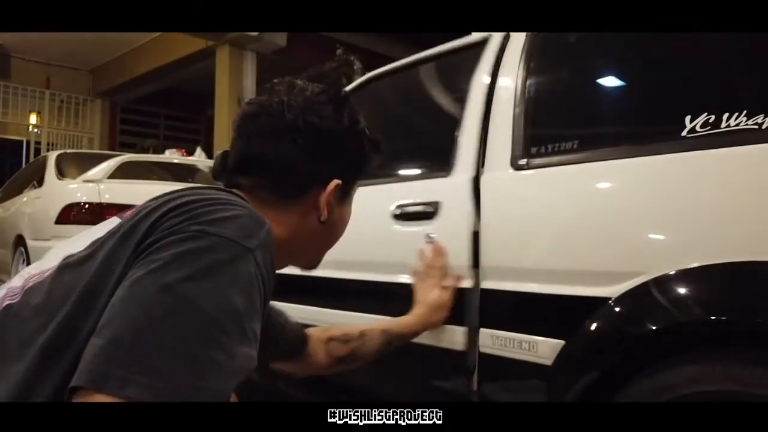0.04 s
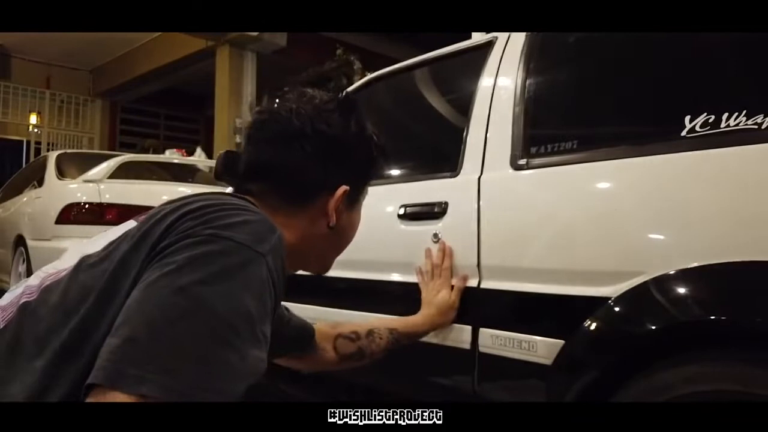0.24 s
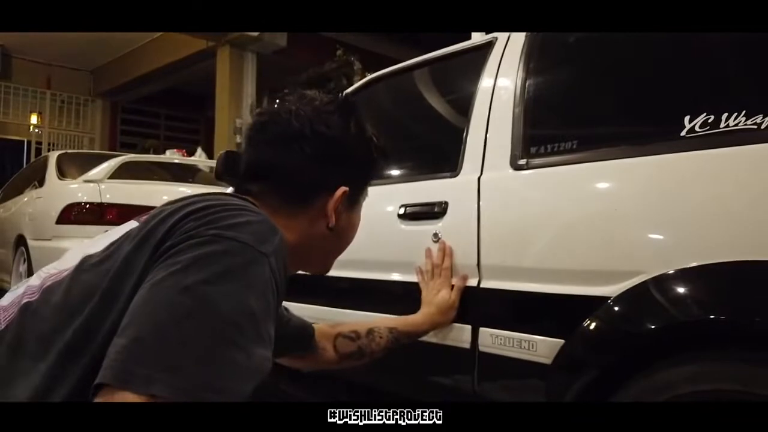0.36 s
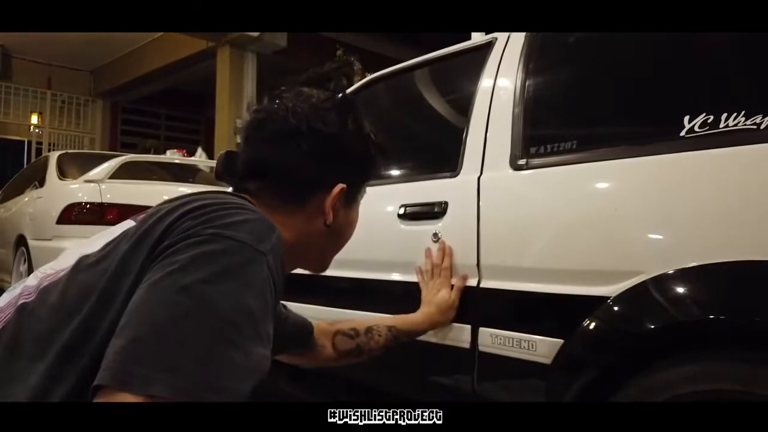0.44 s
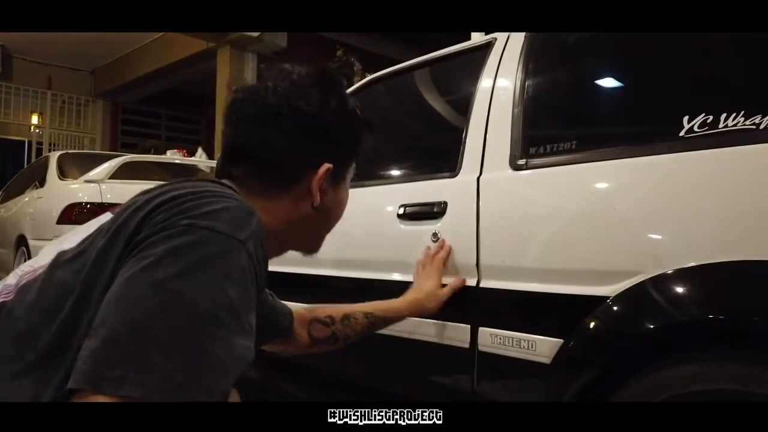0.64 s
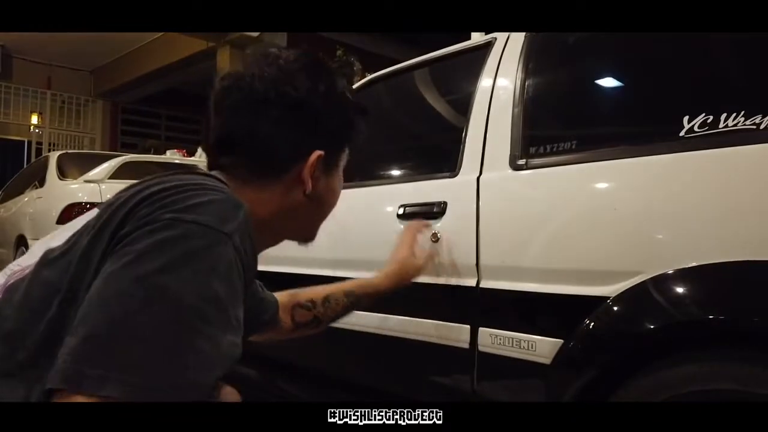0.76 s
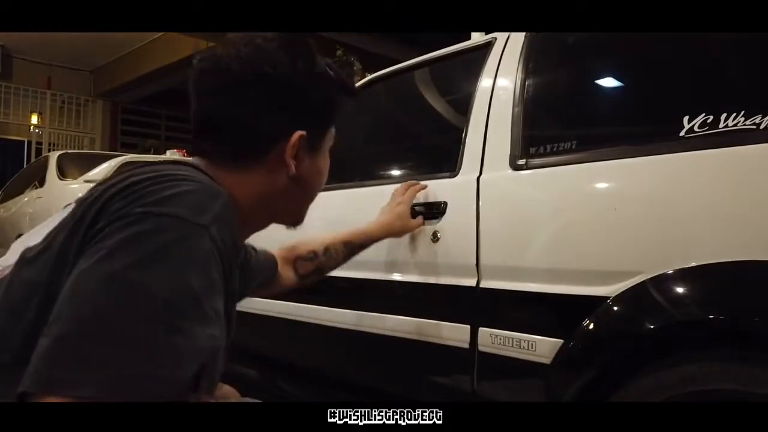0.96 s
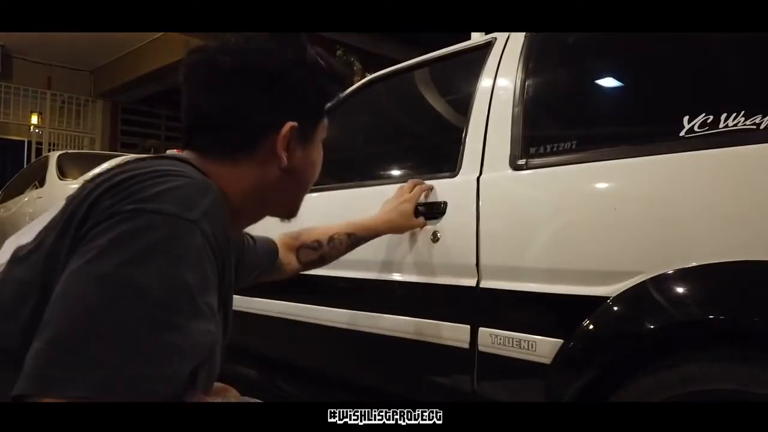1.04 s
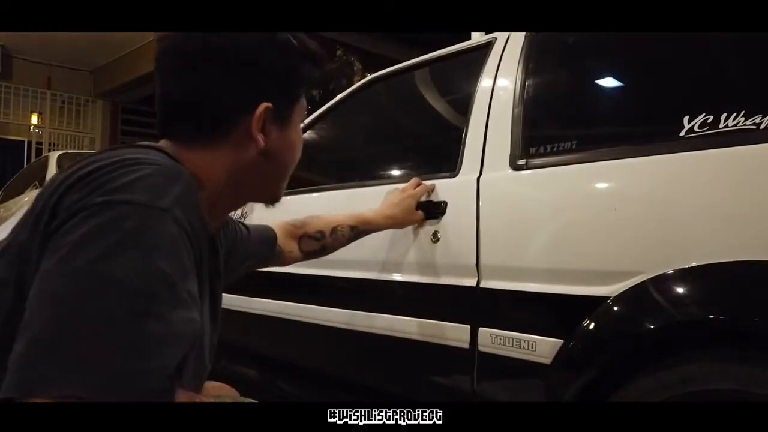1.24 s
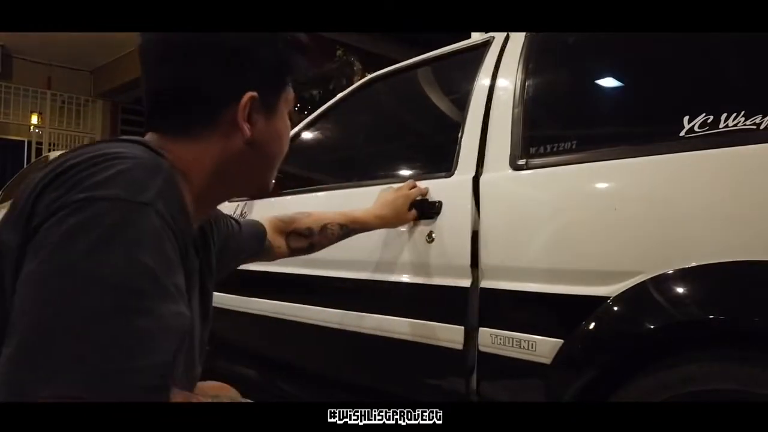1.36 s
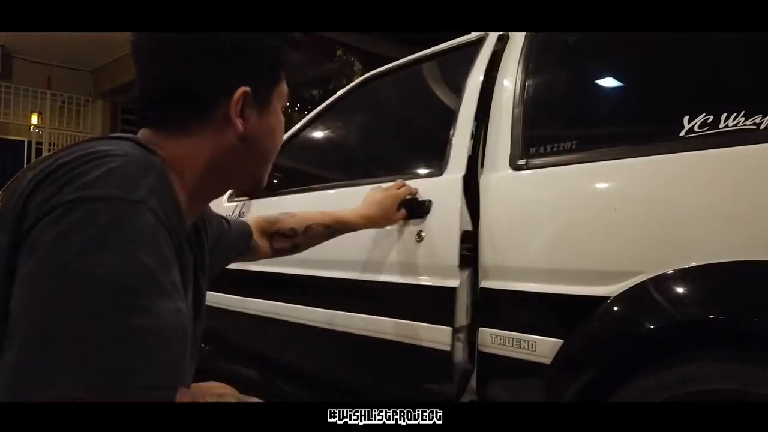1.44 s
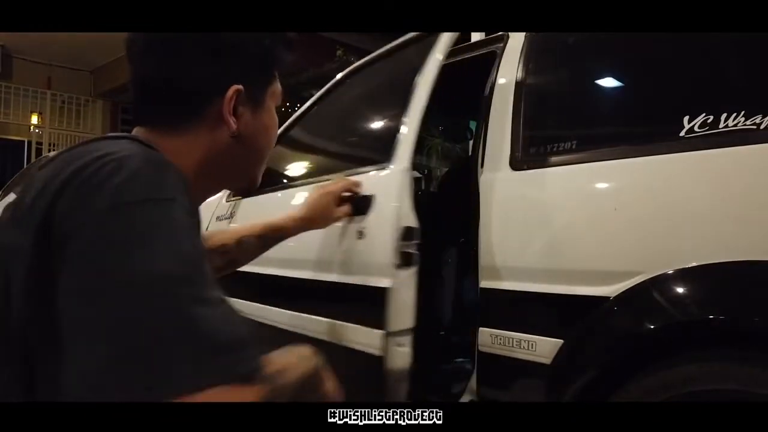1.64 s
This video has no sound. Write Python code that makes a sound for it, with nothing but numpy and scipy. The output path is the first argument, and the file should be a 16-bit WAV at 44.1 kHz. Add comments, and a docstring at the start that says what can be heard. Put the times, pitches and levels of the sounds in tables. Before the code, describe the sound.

Close to the microphone in a quiet carport at night, a car door slams with a latch crack and low boom. After soft taps on the panel, the handle is pulled and the door clicks open again.

```python
"""Car door at night, shut and reopened

A car door is pushed shut under a carport, a metre from a phone: the latch cracks, cabin air booms,
panels ring and trim rattles. After an airy scuff, fingers tap the door skin, the handle squeaks,
its linkage scrapes and the latch clicks free. Insects and town rumble lie underneath."""
import sys
import numpy as np
from scipy import signal
from scipy.fft import rfft, irfft
from scipy.io import wavfile
from scipy.ndimage import uniform_filter1d

SR = 44100
rng = np.random.default_rng(int(sys.argv[2]) if len(sys.argv) > 2 else 0)


def generate_wav(signal):
    """Clip the signal to [-1, 1] and save it as 16-bit WAV at the path in sys.argv[1]."""
    frames = np.transpose(np.atleast_2d(signal))
    scaled = np.clip(frames, -1, 1) * 32767
    pcm = np.round(scaled).astype(np.int16)
    wavfile.write(sys.argv[1], SR, pcm)


N = 74970


def undb(db):
    """Decibels to amplitude."""
    return 10 ** (np.asarray(db) / 20)


def unit(x):
    """Scale to an RMS of one."""
    return x / np.sqrt(np.mean(x ** 2))


def curve(table, col=1):
    """A column of a time table at every sample."""
    points = np.array(table)
    return np.interp(np.arange(N) / SR, points[:, 0], points[:, col])


def at_hz(table, hz):
    """Read a frequency table along a log axis."""
    points = np.array(table)
    return np.interp(np.log(hz), np.log(points[:, 0]), points[:, 1])


def noise(colour):
    """Unit-RMS stereo noise shaped by (frequency [Hz], level [dB]): centred bass, wide treble."""
    # stereo image (frequency [Hz], left-right correlation [0-1])
    likeness = [(60, 0.99), (200, 1), (500, 0.99), (1000, 0.93), (2000, 0.74), (4000, 0.36), (8000, 0.25),
                (16000, 0.4)]
    bins_hz = np.fft.rfftfreq(N, 1 / SR) + 1
    alike = at_hz(likeness, bins_hz)
    spectra = rfft(rng.standard_normal((2, N))) * undb(at_hz(colour, bins_hz))
    mid, side = spectra * np.sqrt([1 + alike, 1 - alike])
    return unit(irfft(np.array([mid + side, mid - side]), N))


def ring(x, hz, t60):
    """One decaying mode, driven by x."""
    pole = np.exp(2j * np.pi * hz / SR - np.log(1000) / (t60 * SR))
    return signal.lfilter([1], [1, -pole], x).imag


def band(x, hz, width_hz):
    """Band-pass around hz."""
    low_hz = max(hz - width_hz / 2, 20)
    return signal.sosfilt(signal.butter(2, [low_hz, low_hz + width_hz], "band", fs=SR, output="sos"), x)


def lowpass(x, hz, order):
    """Dull the treble above hz."""
    return signal.sosfilt(signal.butter(order, hz, fs=SR, output="sos"), x)


def waver(rate_hz):
    """Unit-RMS modulation that glides between random values."""
    step = int(SR / rate_hz)
    held = np.repeat(rng.standard_normal(N // step + 1), step)
    return unit(uniform_filter1d(held, step)[:N])


def arch(t, start, length):
    """A half-sine pulse."""
    return np.sin(np.pi * np.clip((t - start) / length, 0, 1))


def night():
    """The bed: town rumble and hiss with bands of throbbing insect song."""
    # town rumble and hiss (frequency [Hz], relative level [dB])
    town_colour = [(25, -1.5), (142, -12.5), (433, -24.5), (830, -29), (1360, -30), (2000, -30.5),
                   (2700, -33.5), (3700, -37.5), (5000, -34.5), (6100, -45), (8000, -41.5), (11500, -45),
                   (13000, -55), (16500, -80)]
    # insect song (pitch [Hz], width [Hz], level against the town [dB])
    songs = [(4400, 890, -13), (9150.9, 1514.5, -15), (3590, 25, -25), (4620, 23, -16), (4737.3, 50, -34)]
    # the bed sinks after the slam (time [s], level [dB])
    bed_level = [(0, -42), (.2, -41.5), (.3, -53.5), (.9, -53.5), (1.1, -53.5), (1.3, -52), (1.66, -51),
                 (1.7, -51)]
    throb_db, drift_db = 2, 1.0
    white = noise([(20, 0.02), (20000, 0.0061)])
    insects = 0
    for hz, width_hz, db in songs:
        song = unit(band(band(white, hz, width_hz), hz, width_hz))
        insects += undb(db + throb_db * waver(57)) * song
    town = noise(town_colour) * undb(drift_db * waver(6.35))
    return undb(curve(bed_level)) * (town + insects)


def carport_reverb(x, t):
    """The carport's short tail: octave bands of noise, each dying at its own rate."""
    # carport decay (frequency [Hz], t60 [s])
    decay = [(60, 0.26), (250, 0.44), (1000, 0.45), (3000, 0.54), (8000, 0.39), (16000, 0.2203)]
    wet_db = -12
    white = noise([(20, 0.0072), (20000, 0)])
    tail = 0
    for low_hz in 62.5 * 2. ** np.arange(8):
        t60 = at_hz(decay, low_hz * 1.4)
        tail += band(white, low_hz * 1.5, width_hz=low_hz) * undb(-60 * t / t60)
    tail = undb(wet_db) * tail / np.sqrt(np.sum(tail ** 2) / 2)
    return signal.fftconvolve(x.mean(0, keepdims=True), tail, axes=1)[:, :N]


def car_sway():
    """Low rumble of the moving door and rocking car."""
    # rumble envelopes (time [s], sub level [dB], bass level [dB])
    levels = [(0, -50, -60), (.1, -43, -49.5), (.2, -49, -50), (.33, -30.5, -29.5), (.55, -34.5, -49),
              (.7, -38, -56), (.92, -41, -80.5), (1.05, -47, -57), (1.28, -55.5, -63), (1.36, -66, -46.5),
              (1.44, -40, -48), (1.6, -62, -69), (1.7, -51, -52)]
    white = noise([(20, 0), (20000, 0)])
    sub = unit(band(white, 38.9, width_hz=31))
    bass = unit(band(white, 128, width_hz=123))
    return undb(curve(levels)) * sub + undb(curve(levels, col=2)) * bass


def scuff(t):
    """An airy hiss that swells, holds and fades, perhaps a hand sliding on the paint."""
    # scuff spectrum (frequency [Hz], relative level [dB])
    colour = [(530, -32), (900, -19), (1090, -7), (1180, -14), (2930, -3.5), (4020, -12.5), (10900, -19.5),
              (14800, -29), (16500, -54)]
    start_s, attack_s, hold_s, t60 = 0.4906, 0.007, 0.029, 0.37
    level_db, grain_db = -44.5, 2
    age = t - start_s
    envelope = np.clip(age / attack_s, 0, 1) * undb(-60 * np.maximum(age - hold_s, 0) / t60)
    return undb(level_db + grain_db * waver(220)) * envelope * noise(colour)


def squeaks(t):
    """Hinge and handle rub out brief, rough tones."""
    # squeaks (time [s], length [s], pitch [Hz], level [dB])
    rubs = [(.092, 0.033, 1598, -41), (1.297, 0.0454, 1740, -57)]
    roughness = 0.53
    out = 0
    for start, length, hz, db in rubs:
        envelope = np.sqrt(arch(t, start, length)) * (1 + roughness * waver(150))
        out += undb(db) * envelope * np.sin(2 * np.pi * hz * t)
    return out


def linkage_scrape(t):
    """The linkage scrapes with a coarse grain while the handle is pulled."""
    # scrape envelope (time [s], level [dB])
    pull = [(1.3, -75), (1.345, -61.5), (1.41, -64), (1.44, -44), (1.455, -29), (1.49, -33.5),
            (1.53, -40.5), (1.58, -52), (1.66, -65.5), (1.7, -76)]
    # scrape spectrum (frequency [Hz], relative level [dB])
    colour = [(88, -45), (150, -6), (409, -22), (508, -48), (682, 8.5), (752, -17), (898, 4), (4160, -9.5),
              (11400, -21.5), (15600, -51.5), (16500, -83)]
    grain_db = 3.3
    return noise(colour) * undb(curve(pull) + grain_db * waver(300)) * (t > pull[0][0])


def trim_rattle(t):
    """Loose trim and glass shake in the slam: fluttering noise, brightest at the start."""
    # rattle envelope (time [s], level below 2 kHz [dB], treble against that level [dB])
    shake = [(.2122, -46, 13), (.2138, -45, 5.5), (.224, -33, 8.5), (.238, -23.5, -1), (.27, -21.5, 0.5),
             (.292, -18.5, -4.5), (.3, -21.5, -3.5), (.335, -29.5, -3), (.45, -44.5, -4.5), (.6, -55, -13),
             (.75, -93, -12)]
    # rattle spectrum (frequency [Hz], relative level [dB])
    colour = [(160, -20), (280, -7.5), (603, -4.5), (1010, -9.5), (2060, -10), (2320, -14), (2750, -13.5),
              (9400, -24.5), (11000, -23), (15400, -32.5), (16500, -67)]
    flutter_db = 1.1
    chatter = noise(colour) * undb(flutter_db * waver(300))
    low = lowpass(chatter, 2000, order=2)
    treble = undb(curve(shake, col=2)) * unit(chatter - low)
    gate = (t > shake[0][0]) * (t < shake[-1][0])
    return undb(curve(shake)) * (unit(low) + treble) * gate


def clicks(t):
    """Latch, handle and fingers: each hit is a noise burst that also rings one small part."""
    # hard hits (time [s], burst level [dB], ring pitch [Hz], ring level [dB], ring width [Hz],
    # t60 [s], burst cutoff [Hz])
    hits = [(0.097, -42.5, 1557, -56, 80, 0.22, 1980), (.848, -79, 943, -46.5, 90, 0.18, 1500),
            (0.2118, -16.5, 792.7, -20.5, 152.7, 0.088, 14400), (0.2156, -28, 1026, -15, 150, 0.028, 14800),
            (0.26, -40, 11200, -28, 3000, .08, 15000), (0.301, -51, 2005, -44, 550, 1.29, 2900),
            (0.2238, -30, 1408, -13.5, 300, 0.0426, 3974), (0.287, -25, 7000, -22, 1900, 0.042, 8000),
            (.7268, -39.5, 900, -82, 500, 0.0972, 2593), (0.834, -48.5, 700, -57.5, 198, 0.24, 3200),
            (1.342, -49, 1530, -51, 302.5, 0.081, 2500), (1.375, -54, 2650, -54.5, 400, 0.12, 4000),
            (1.45, -67, 421, -35.5, 77, 0.29, 1500), (1.419, -59, 670, -45.5, 200, 0.049, 1500),
            (1.443, -32.5, 950, -34, 300, 0.09, 8608), (1.4496, -26.5, 10800, -27.5, 2900, 0.045, 11860),
            (1.4507, -22, 896, -32, 493, 0.047, 13800), (1.454, -54, 2570, -19, 400, 0.025, 14210),
            (1.4722, -23, 1460, -24, 1511, 0.026, 12250), (1.5, -26.5, 4970, -28, 197.8, 0.046, 11600)]
    attack_s = 0.0015893
    out = 0
    for start, burst_db, hz, ring_db, width_hz, t60, cutoff_hz in hits:
        age = np.maximum(t - start, 0)
        envelope = np.minimum(age / attack_s, 1) * undb(-60 * age / t60)
        hiss = noise([(150, 0), (600, 2), (16000, -9.5)])
        burst = lowpass(hiss * envelope, cutoff_hz, order=4)
        rough = band(hiss * envelope, hz, width_hz) / np.std(band(hiss, hz, width_hz))
        tone = np.sqrt(2) * envelope * np.sin(2 * np.pi * hz * age)
        tone_share = 0.6 if width_hz < hz / 4 else 0  # only narrow rings carry a clean tone
        out += undb(burst_db) * burst + undb(ring_db) * (tone_share * tone + (1 - tone_share) * rough)
    return out


def cabin_boom(t):
    """The door squeezes the cabin air: a low tone that rises as the seal closes."""
    start_s, attack_s, hold_s, release_s = 0.2225, 0.0073, 0.043, 0.062
    level_db, start_hz, rise_hz_per_s = -8, 32, 254
    age = np.maximum(t - start_s, 0)
    release = np.clip((age - attack_s - hold_s) / release_s, 0, 1)
    envelope = np.minimum(age / attack_s, 1) * np.cos(np.pi * release / 2) ** 2
    cycles = start_hz * age + rise_hz_per_s * age ** 2 / 2
    return undb(level_db) * envelope * np.sin(2 * np.pi * cycles)


def panel_thud(t):
    """Soft blows and rebounds ring the low modes of door and body."""
    # blows (time [s], level [dB], contact [s], weight [+ inward, - rebound])
    blows = [(0.2277, -14.5, 0.0052, 0.98), (.233, -13.5, 0.0076, -1.57), (0.25, -13.5, 0.0046, 1),
             (.264, -23, 0.0055, -0.9), (0.273, -13.5, 0.0046, 1), (.285, -11, 0.0044655, -0.83),
             (0.331, -19.5, 0.0051, 1), (1.418, -39.5, 0.0081, -1.1)]
    # door and body modes (frequency [Hz], gain [dB], t60 [s])
    modes = [(35.01, -25.5, 1.34), (43.37, -27.5, 1.4), (84.7, -20.5, .9), (88.3, -11, 0.96),
             (99.7, -1, 0.22), (130.3, -6, 0.26), (178.2, 7.5, 0.1), (248.2, 11, 0.12),
             (348.84, -21, 0.2326), (406, -27, 0.258), (470, -34.5, .2), (546.3, -24, 0.21),
             (784.1, -10, 0.17)]
    force = 0
    for start, db, contact_s, weight in blows:
        pulse = arch(t, start, contact_s) * np.pi / (2 * contact_s * SR)  # unit area
        force += weight * undb(db) * pulse
    return sum(undb(db) * ring(force, hz, t60) for hz, db, t60 in modes)


def scene():
    """The crisp layers feed the carport reverb; the low end and the bed stay dry."""
    t = np.arange(N) / SR
    crisp = trim_rattle(t) + linkage_scrape(t) + clicks(t) + squeaks(t) + scuff(t)
    return crisp + carport_reverb(crisp, t) + cabin_boom(t) + panel_thud(t) + car_sway() + night()


def record(dry):
    """The phone drops the lowest bass, rounds the loudest peaks and cuts the top."""
    bass_cut_hz, top_hz, drive = 13.364, 16700, 0.71
    trimmed = signal.sosfilt(signal.butter(2, bass_cut_hz, "high", fs=SR, output="sos"), dry)
    rounded = np.tanh(drive * trimmed) / 0.87
    return signal.sosfilt(signal.ellip(12, .2, 90, top_hz, fs=SR, output="sos"), rounded)


dry = scene()
out = record(dry)
generate_wav(out)
```